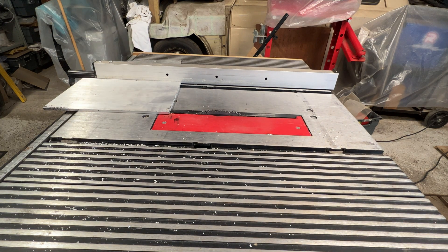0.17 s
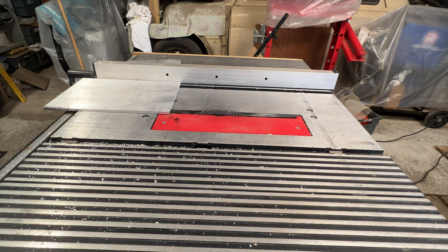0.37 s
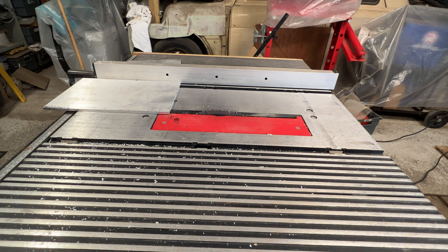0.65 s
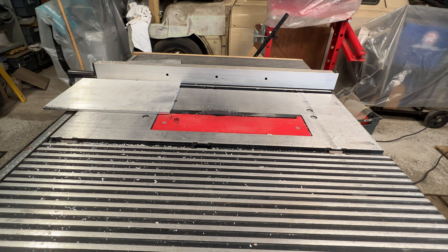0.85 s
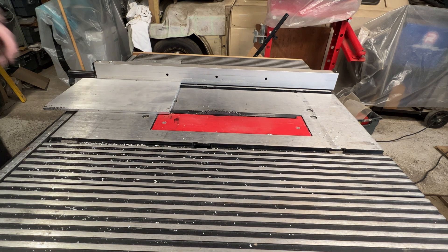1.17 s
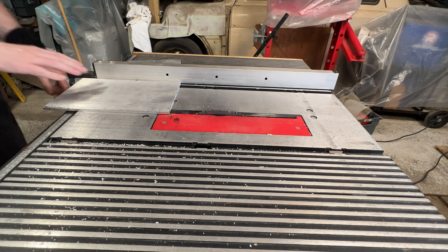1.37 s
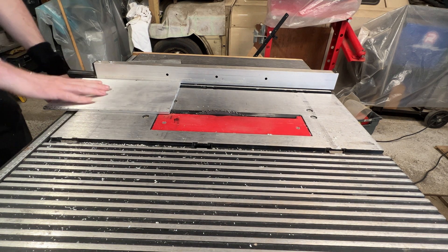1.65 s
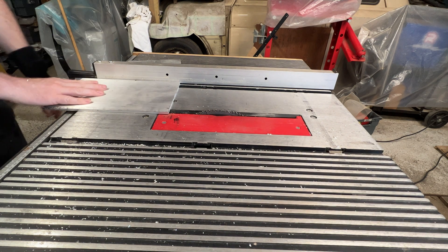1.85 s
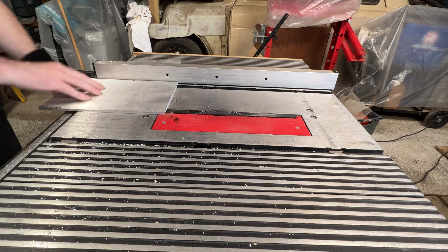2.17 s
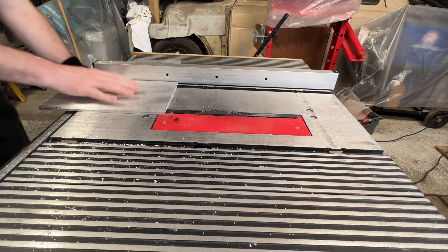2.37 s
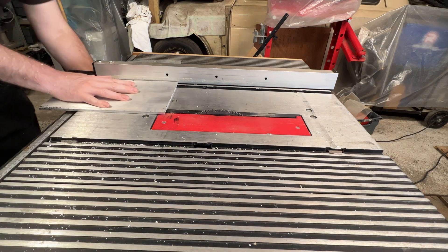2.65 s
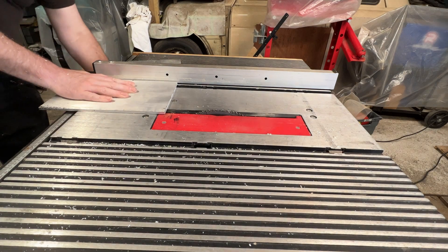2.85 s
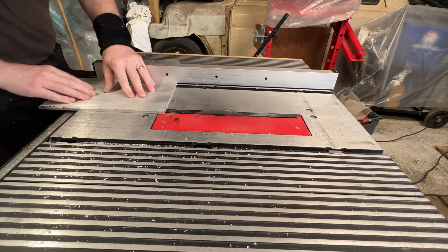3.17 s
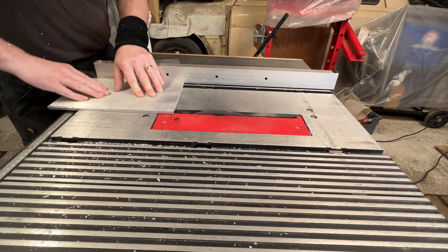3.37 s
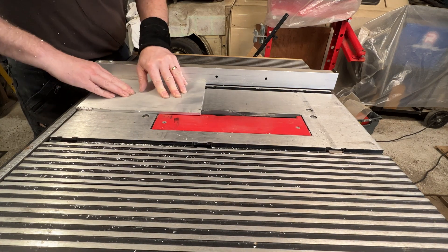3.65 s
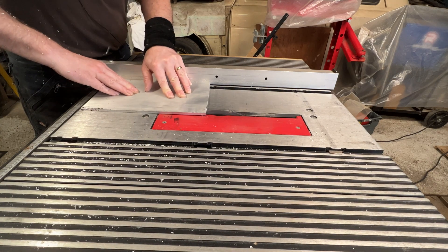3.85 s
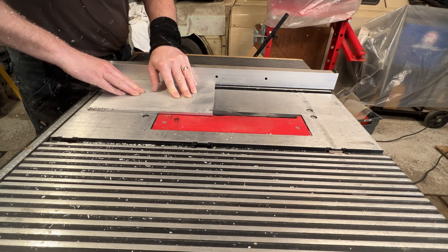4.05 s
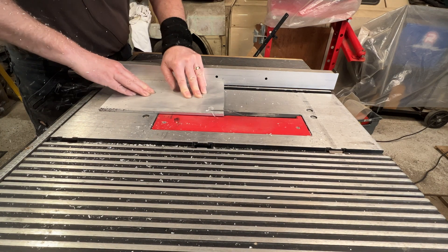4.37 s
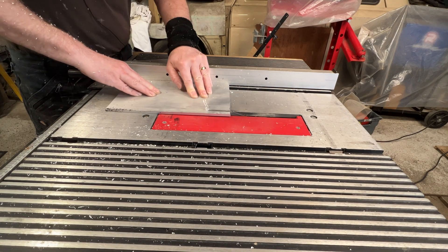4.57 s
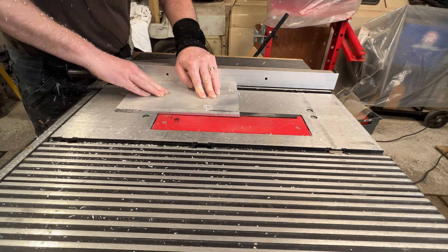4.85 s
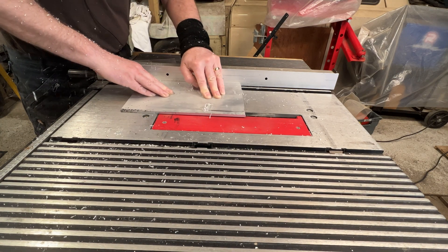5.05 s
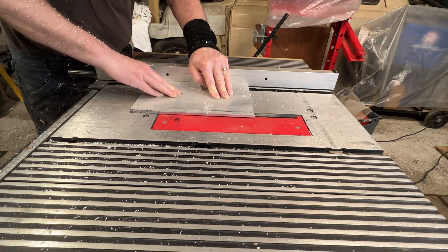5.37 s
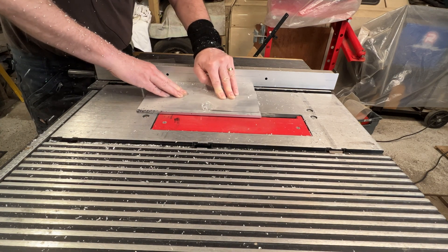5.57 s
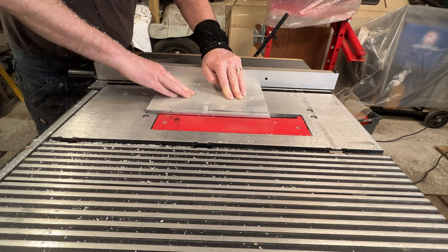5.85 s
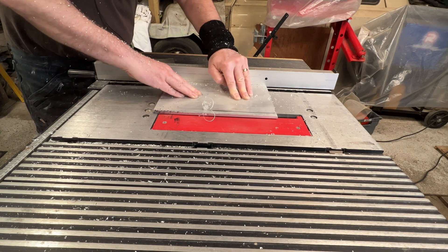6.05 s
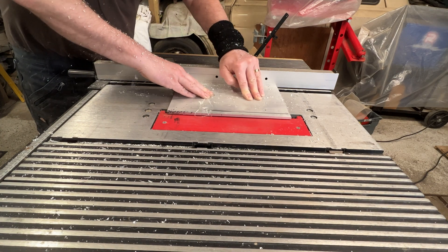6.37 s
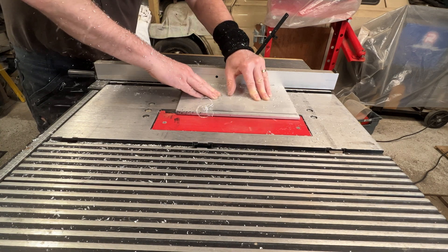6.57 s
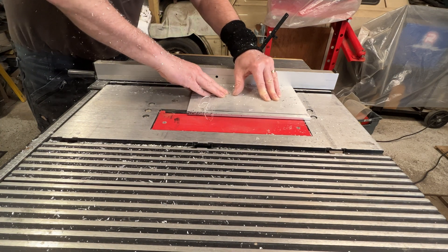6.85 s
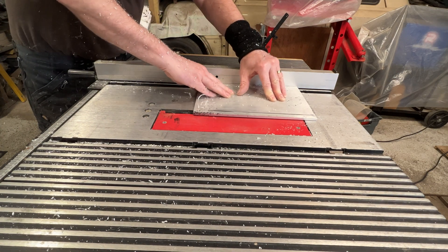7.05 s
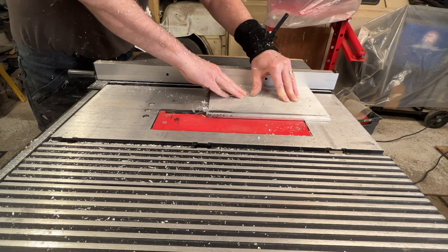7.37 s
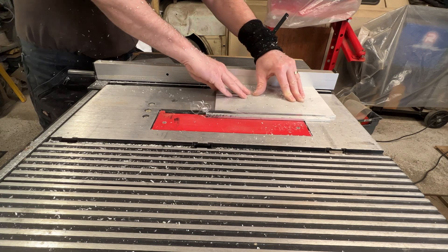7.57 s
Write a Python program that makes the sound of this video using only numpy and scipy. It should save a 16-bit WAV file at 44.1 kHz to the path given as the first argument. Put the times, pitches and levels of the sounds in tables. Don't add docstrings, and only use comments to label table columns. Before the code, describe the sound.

In a quiet workshop with faint mains hum, a metal plate is knocked, rubbed and dragged over a ribbed saw table with small ticks and scrapes. Abruptly a switch slams, a brushed motor whirs up, and the blade bites thick aluminium: a very loud, ragged screech with shifting squeals, chip hiss and motor roar, easing as the blade breaks through at the end. One close microphone, practically mono.

```python
import sys
import numpy as np
from scipy import signal
from scipy.fft import rfft, irfft, next_fast_len
from scipy.io import wavfile
from scipy.ndimage import uniform_filter1d

SR = 44100
rng = np.random.default_rng(int(sys.argv[2]) if len(sys.argv) > 2 else 0)


def attenuation_scalar(level_db):
    decades = np.asarray(level_db, float) / 20
    return 10 ** decades


def dump(signal):
    limited = np.clip(np.atleast_2d(signal).T, -1, 1)
    pcm = np.round(limited * 32767).astype(np.int16)
    wavfile.write(sys.argv[1], SR, pcm)


N = 340011
T = np.arange(N) / SR
STEP = 16
BLOCK = 2048

SCENE_CHANGE_S, START_S, BITE_S, EXIT_S = 2.875, 2.98, 3.61, 7.42
TOOTH_COUNT, FREE_TOOTH_HZ = 50, 4390

# t/s, tooth rate f/Hz
SPEED = [(2.98, 2676), (3.05, 3298), (3.22, 3872), (3.4, 4170), (3.67, 4170), (3.8, 3970), (3.92, 3690),
         (4.1, 3335), (4.5, 3195), (5.0, 3110), (5.6, 3150), (5.92, 3215), (6.3, 3020), (6.42, 3120),
         (6.75, 3024), (7.0, 3172), (7.42, 3180), (7.5, 3440)]
# t/s, level/dB
FEED = [
    (3.65, -53),
    (3.74, -17),
    (4.67, -15.5),
    (5.58, -17),
    (6.21, -17),
    (6.7, -16.5),
    (7.33, -16),
    (7.49, -26.5),
    (7.71, -20.5),
]
# t/s, length/s, level/dB
WHISTLE_DB = (-38, -38.5, -47, -50)
SHRIEKS = [
    [(3.65, 0.18, -38), (4.5, .45, -43), (5.45, 0.36, -40), (6.45, .2, -43), (6.75, 0.6, -35)],
    [(3.655, 0.07, -26), (3.72, .09, -27), (3.78, .3, -43), (3.4, .32, -36), (4.085, 0.27, -26.5),
     (4.4, .2, -33), (4.87, 0.3, -26), (5.25, 0.4, -30), (4.55, .3, -34), (6.42, 0.46, -47),
     (5.9, 0.2, -27.5), (6.08, 0.3, -29.5), (7.05, 0.45, -30)],
    [(3.65, .09, -37), (3.97, .12, -39), (4.25, 0.3, -42)],
    [(3.66, .06, -46)],
]
# f/Hz, density/(dB per Hz)
BITE = [(530, -6), (800, 0), (1050, -4), (1550, -4), (2390, 1), (3140, -8), (3410, 1), (3720, -4),
        (6120, -7.5), (7500, -26), (9750, -28), (16500, -120)]
# f/Hz, density/(dB per Hz)
CHIPS = [(2940, -19.5), (5000, -6.5), (5640, -4.5), (6260, -8), (6920, -7.5), (11000, -8.5), (12500, -10.5),
         (15700, -12.5)]
# t/s, length/s, level/dB
SPRAY = [
    (3.655, 0.058, -33),
    (7.1, 0.35, -37),
]
# f/Hz, width/Hz, level/dB
BLADE_MODES = [(1890, 115, -5.5), (2330, 21, 9), (2750, 540, 4.5), (2890, 20, -1), (4046, 180, -1),
               (5300, 96, -21)]
# f/Hz, width/Hz, level/dB
RIM_MODES = [(6620, 220, 1.5), (7270, 120, 3), (8000, 170, -1), (8470, 170, -2), (9800, 150, -10),
             (12700, 230, -17)]
# t/s, length/s, level/dB, f/Hz
HOWLS = [(3.72, 0.46, -29, 2998), (4.15, 0.74, -26.5, 2640), (5.0, 0.46, -47, 2765),
         (5.45, 0.53, -31, 2653), (6.0, .45, -38, 2750), (6.48, 0.29, -31, 2400), (7.15, 0.32, -38, 2824)]
# f/Hz, width/Hz, steady level/dB
RINGS = [(1383, 127, -37.5), (3440, 80, -32.5), (4504, 90, -36), (5010, 62, -35.5)]
# t/s, length/s, level/dB
FLARES = [
    [(6.72, 0.17, -28)],
    [(4.3, .4, -34), (5.3, 0.84, -35), (6.2, 0.35, -29), (5.9, 0.43, -37), (7.0, .4, -33)],
    [(3.66, 0.22, -46), (6.38, .2, -44), (5.6, 0.4, -41)],
    [(5.9, 0.51, -40), (6.55, 0.35, -44), (7.05, .3, -37)],
]
# f/Hz, density/(dB per Hz)
CLATTER = [(500, -22), (700, 3.5), (1300, -2.5), (2000, 0), (2900, 1), (3500, -4), (4500, -20)]
# t/s, length/s, level/dB
STEADY_CUT = [(4.4, 1.33, -27), (5.7, 1.02, -26)]
# t/s, length/s, start f/Hz, end
# f/Hz, level/dB
SQUEALS = [(3.69, 0.07, 4350, 3900, -24.5), (3.68, .1, 4480, 4400, -28), (3.7, 0.13, 2900, 2510, -30),
           (6.45, .17, 12450, 12300, -42), (6.62, .06, 12200, 12160, -35), (6.68, .14, 12050, 12030, -35),
           (6.8, .13, 12080, 12350, -38), (6.63, .08, 2380, 2700, -30), (3.702, 0.27, 6620, 6670, -30.5),
           (6.92, 0.07, 4030, 4046, -24.5), (7.3, 0.06, 3060, 3010, -22), (7.35, .05, 2880, 2720, -21)]
# t/s, length/s, level/dB, f/Hz
CRIES = [(3.8, 0.36, -28.5, 1966), (3.851, .27, -24.5, 3510), (3.9, 0.34, -29, 4320),
         (4.0, .3, -30.5, 1720), (4.15, 0.31, -22, 2537), (4.303, .2, -25, 2870), (4.48, .28, -23.5, 2844),
         (4.451, 0.33, -29, 2450), (4.66, 0.19, -25, 2365), (4.7, 0.53, -35, 1720), (4.72, .2, -32, 700),
         (4.801, 0.66, -31, 2680), (4.949, .36, -33, 1950), (5.0, .2, -34, 2420), (5.05, .36, -32.5, 4520),
         (5.3, .2, -32, 2450), (5.279, 0.49, -38, 1320), (5.448, 0.23, -33, 1470), (5.42, 0.31, -26, 2880),
         (5.7, .25, -36, 3902), (5.702, 0.2, -24.5, 2370), (5.72, 0.48, -27.5, 2956),
         (5.698, 0.52, -29, 2696), (5.841, .42, -36, 1320), (6.1, 0.19, -31, 1850), (6.25, 0.27, -28, 2600),
         (6.347, .2, -30, 2330), (6.35, 0.22, -28.5, 1550), (6.52, 0.13, -23.5, 2190),
         (6.549, .14, -24, 2340), (6.67, 0.12, -21.5, 2720), (6.5, .17, -31, 1290), (6.9, .27, -28, 2467),
         (6.9, 0.29, -30, 1420), (6.952, .4, -29, 2750), (6.802, .15, -37, 5380), (7.15, 0.7, -31.5, 5390),
         (7.152, .2, -31, 1620), (7.449, .26, -33, 4400),
         (3.655, .11, -39, 8620), (3.897, .16, -40, 7290), (4.0, .6, -36, 8500), (4.65, 1.1, -36, 8060),
             (5.0, .3, -29, 5850), (3.698, .5, -36, 10000), (4.38, .17, -34, 9600), (6.405, .6, -36, 7350),
             (6.899, 0.49, -43, 8080), (5.45, 0.49, -29, 6080), (6.65, .2, -36, 5500),
             (5.55, .15, -44, 12500), (4.25, .15, -44, 12900), (7.33, .14, -35, 7250),
             (7.33, .14, -36, 6620), (7.15, .22, -41, 12500), (7.385, .05, -35, 12950),
             (7.62, .06, -40, 13850), (7.5, .2, -38, 8550)]
# t/s, length/s, rms level/dB, f/Hz
TONES = [(4.68, .74, -34, 754), (5.48, .34, -33, 754), (5.32, .45, -32, 1325), (5.8, .4, -35, 1335),
         (5.44, .27, -35, 1450), (4.98, .2, -29, 560), (5.17, .17, -30, 560), (4.74, .13, -34, 690),
         (5.42, .25, -31, 2960), (5.85, .27, -32, 2990), (3.87, .2, -37, 7300), (5.4, .5, -34, 3300),
         (4.8, .3, -39, 1380), (3.2, 4.5, -36, 474), (3.2, 2.4, -36.5, 452), (5.8, 1.9, -38, 517),
         (4.0, 1.5, -36, 538), (3.87, .25, -31, 3500), (3.3, .4, -34, 409), (4.2, 2.5, -33.5, 3444),
         (6.7, .95, -36, 3490), (7.38, .33, -31, 4410), (4.3, 3.1, -42, 5017), (4.4, 1.5, -35, 2694),
         (4.2, 1.3, -35, 2440), (6.6, .35, -39, 1380), (4.9, 2.4, -39, 4504)]
# f/Hz, density/(dB per Hz)
CASE = [(12, -56), (20, -20.5), (130, -10.5), (156, -12.5), (188, -10.5), (320, -5), (367, -11),
        (463, -1.5), (655, -8), (2080, -15.5), (2810, -14.5), (5000, -25.5), (6500, -38), (11000, -120)]
# f/Hz, density/(dB per Hz)
AIR = [(2350, -31), (4000, -3), (6260, -2.5), (6790, -6), (13600, -17.5), (15800, -24)]
# t/s, length/s, level/dB
DRIVE_DB = (-44.5, -38.5, -42)
SHUDDERS = [
    [(3.25, 0.5, -28.5), (4.05, 0.16, -42), (4.9, 1.1, -45), (7.4, .13, -42)],
    [(3.1, 0.48, -31), (3.88, 0.32, -29), (5.2, 0.32, -32), (7.4, 0.13, -27)],
    [(4.65, 1.27, -40)],
]
# t/s, length/s, level/dB
WHOOSH = [(2.99, 0.24, -29.5)]
# t/s, peak level/dB, t60/s
SWITCH = [
    (2.9614, -22, 0.034),
    (2.966, -3.5, 0.12),
    (2.981, -11, 0.15),
]
# f/Hz, density/(dB per Hz)
BANG = [(24, -50), (45, -17), (166, -2), (670, -2), (1080, -7.5), (1190, -7), (2450, -10.5), (4800, -21),
        (5720, -20.5), (15500, -38)]
# f/Hz, density/(dB per Hz)
RUMBLE = [(76, -46), (130, -8), (211, -4.5), (394, 1.5), (471, -4), (632, 0.5), (1100, -20), (1430, -50),
          (2420, -120)]
# f/Hz, density/(dB per Hz)
SCUFF = [(470, -22), (800, -1.5), (1490, -3.5), (1920, -3), (2060, -7), (2380, -3), (3400, -18),
         (4420, -45), (7480, -120)]
# f/Hz, density/(dB per Hz)
GRIT = [(1590, -30), (2700, -1), (3270, -4), (4280, 1), (5060, -5), (6040, -5.5), (6830, -10), (15500, -29)]
# f/Hz, width/Hz, level/dB
GRIT_RING = [(3050, 300, -7), (4000, 120, -8), (5900, 500, -6), (7620, 300, -8), (10500, 400, -15)]
# peak t/s, rise/s, fall/s, level/dB, brightness/dB
STROKES = [(0.0, .01, .17, -32.5, -3.5), (.334, 0.19, .07, -56.5, -1), (.71, 0.088, 0.099, -50, -1.5),
           (.95, .002, 0.024, -36.5, -3), (.976, 0.027, 0.11, -55, -13), (1.09, 0.15, 0.27, -58.5, -6),
           (1.7, 0.033, 0.17, -49, -2.5), (1.946, 0.36, 0.12, -48, 0), (2.09, 0.025, 0.057, -59, -7),
           (2.3, 0.56, 0.91, -61.5, 4), (2.572, .12, 0.18, -61, -7), (2.873, 0.23, .004, -45, 0)]
# peak t/s, rise/s, fall/s, level/dB
SING = [
    (1.698, 0.018, 0.097, -53),
    (2.08, 0.017, 0.28, -70),
    (2.534, 0.16, 0.13, -54),
]
# t/s, length/s, buzz level/dB
RIBS = [(1.12, 0.67, -53)]
# f/Hz, width/Hz, level/dB
RIB_RING = [(640, 45, 8), (800, 33, -14), (1260, 85, -1.5), (1600, 96, -14), (2000, 86, -18),
            (2350, 110, -17), (3050, 110, -18), (3670, 110, -17), (5000, 150, -17), (950, 68, -16),
            (370, 78, -7)]
# t/s, peak level/dB, f/Hz, width/Hz, t60/s
TICKS = [(0, -37, 640, 160, 0.37), (.281, -39, 3000, 903, 0.013), (.282, -67, 4600, 1500, .01),
         (.568, -49, 2900, 800, .014), (.569, -50, 4500, 900, .01), (.582, -56, 4000, 2500, .008),
         (.676, -50, 6000, 8000, .008), (.686, -50, 5000, 6000, .008), (0.705, -38, 4430, 2500, 0.008),
         (0.704, -49, 8500, 6000, .01), (2.079, -61, 4000, 600, .03), (2.088, -45, 4000, 600, .04),
         (2.089, -51, 1950, 600, .04), (2.523, -52, 1240, 900, .25), (2.562, -39, 1140, 700, 0.14),
         (2.529, -49, 440, 130, .3), (2.585, -46, 440, 130, .4), (2.563, -37, 1300, 300, .08),
         (1.164, -46, 800, 900, .03), (0, -36, 260, 90, .3), (0, -42, 1200, 200, .2),
         (1.384, -44, 640, 120, .15), (.9493, -35, 1300, 1500, .05), (2.564, -44.5, 780, 150, 0.45),
         (.96, -42, 232, 60, 0.75), (1.163, -47, 900, 1000, .03), (1.366, -37, 640, 200, 0.1),
         (2.771, -43, 1500, 2500, 0.05), (2.77, -56, 5000, 4000, .04), (2.711, -56, 2000, 2500, .03),
         (2.929, -56, 550, 700, 0.081)]
# t/s, peak level/dB, f/Hz, t60/s
THUDS = [(.95, -36, 130, .12), (2.09, -46, 190, .15), (1.02, -39, 66, 0.47), (1.164, -27, 124, 0.053),
         (1.72, -37, 67, 0.28), (3.09, -30, 68, 0.34), (7.43, -12, 145, 0.19), (7.461, -12, 274, 0.16)]
# f/Hz, level/dB, t60/s
KNOCK = [(282, 4.5, 0.057), (560, -30, 0.38), (1100, -12, 0.11), (1320, -5, 0.04), (1800, -0.5, 0.021)]
# t/s, length/s, level/dB, f/Hz, width/Hz
SCRAPES = [(1.69, .07, -60, 2450, 400), (1.69, .07, -62, 4200, 400), (1.86, .13, -58, 1900, 250),
           (1.88, .1, -60, 1250, 250), (1.88, .1, -62, 2450, 300), (1.88, .12, -57, 650, 300),
           (2.18, .05, -69, 4000, 200), (2.46, .1, -66, 3050, 300), (2.81, .065, -59, 2800, 500),
           (2.8, .075, -62, 4500, 500), (2.68, .15, -61, 780, 100), (1.0, .15, -52, 232, 50),
           (1.42, .2, -55, 660, 90), (1.3, .35, -70, 2730, 90), (2.52, .13, -55, 1300, 600),
           (2.15, .35, -69, 8500, 2600), (1.58, .1, -57, 660, 90)]
# f/Hz, density/(dB per Hz)
ROOM = [(15, -13), (30, -30), (60, -20), (130, -31), (250, -30.5), (565, -37), (746, -34), (857, -40),
        (3000, -49.5), (11400, -54), (15500, -60)]
# f/Hz, rms level/dB
HUM = [(100, -54.5), (200, -75)]
SIDE_S = [3.46, 3.853, 3.948, 3.994, 4.203, 4.968, 5.2, 5.27, 5.293, 5.387, 5.711, 6.13, 6.339, 6.456,
          6.573, 7.105, 7.129, 7.361, 7.5, 7.523]


def blade(tooth_hz):
    gate, feed_db = curves(FEED, edge_s=0.028)
    tooth = (np.cumsum(tooth_hz) / SR).astype(int) % TOOTH_COUNT
    runout = uniform_filter1d(rng.standard_normal(TOOTH_COUNT), size=17, mode="wrap")
    depth = attenuation_scalar(1.1 * unit(runout)[tooth])
    cutting = attenuation_scalar(-3 * between(EXIT_S, 9, 0.032, 1))

    whistle = np.zeros(N)
    for multiple, (db, rows) in enumerate(zip(WHISTLE_DB, SHRIEKS), 1):
        whistle += swells(db, rows) * attenuation_scalar(0.98 * walk(14)) * band(multiple * tooth_hz, 74.0 * multiple)
    whistle *= depth * cutting ** 2

    hits = depth * grains(0.39, size=14)
    bite = colour(hits, BITE) + attenuation_scalar(-2.5) * ring(hits, BLADE_MODES, 1.5, rate=5)
    chips = colour(hits, CHIPS) + attenuation_scalar(-8.0) * ring(hits, RIM_MODES, 1.8, rate=5)
    chips *= cutting * swells(-27, SPRAY) * attenuation_scalar(0.5 * walk(9.9))

    at_s, length_s, _, hz = np.transpose(HOWLS)
    howl_hz = np.interp(T, at_s + length_s / 2, hz) * (1 + 0.02 * walk(6))
    howl = swells(-30.5, HOWLS) * depth * band(howl_hz, 450.0)

    rings = np.zeros(N)
    for (hz, width_hz, db), rows in zip(RINGS, FLARES):
        rings += swells(db, rows) * attenuation_scalar(0.8 * walk(6)) * band(hz * (1 + 0.004 * walk(3)), width_hz)
    return gate * (whistle + rings + attenuation_scalar(feed_db - 6.5) * bite + chips + howl + clatter(tooth_hz))


def clatter(tooth_hz):
    points = 700
    turns = np.cumsum(tooth_hz) / SR / TOOTH_COUNT
    fresh = rng.standard_normal((N // points + 40, points))
    pattern = signal.lfilter([1], [1, -0.866], fresh, axis=0).ravel()
    knocks = np.interp(turns * points, np.arange(len(pattern)), pattern)
    return swells(-45, STEADY_CUT) * colour(knocks, CLATTER)


def squeals():
    out = np.zeros(N)
    held = [(at_s, length_s, hz, hz, db) for at_s, length_s, db, hz in CRIES]
    for at_s, length_s, start_hz, end_hz, db in SQUEALS + held:
        span = span_of(at_s, length_s)
        part = (T[span] - at_s) / length_s
        glide_hz = end_hz - start_hz
        width_hz = start_hz / 23.4 / max(start_hz / 2800.0, 1)
        width_hz += 0.051 * abs(glide_hz) / length_s
        swell = np.abs(np.sin(np.pi * part)) ** 0.42
        out[span] += attenuation_scalar(db) * swell * band(start_hz + glide_hz * part, width_hz)
    return out


def tones():
    out = np.zeros(N)
    wander = 1 + 0.004 * walk(12)
    flicker = attenuation_scalar(3.5 * walk(22))
    for k, (at_s, length_s, db, hz) in enumerate(TONES):
        span = span_of(at_s, length_s)
        own = np.arange(N)[span] - k * SR // 9
        swell = np.abs(np.sin(np.pi * (T[span] - at_s) / length_s)) ** 0.5
        tone = np.sqrt(2) * np.sin(2 * np.pi * hz * np.cumsum(wander[own]) / SR)
        out[span] += attenuation_scalar(db) * swell * flicker[own] * tone
    return out


def motor(tooth_hz):
    speed = tooth_hz / FREE_TOOTH_HZ
    loaded = between(BITE_S, EXIT_S - 0.05, 0.12, 0.067)
    kick = np.exp(-np.abs(T - START_S) / 0.012)
    roar_db = -16.5 + 9 * kick - 2.5 * loaded + 0.6 * walk(14)
    casing_db = -5.0 + 1.5 * (between(3.14, 9, 0.15, 1) - loaded)
    roar = colour(grains(1.28, size=80), CASE) + attenuation_scalar(casing_db) * band(np.full(N, 485.0), 160.0)

    turn_hz = tooth_hz / TOOTH_COUNT
    second, fourth, mesh = (swells(db, rows) * attenuation_scalar(0.8 * walk(4.0)) for db, rows in zip(DRIVE_DB, SHUDDERS))
    hum = second * np.sqrt(2) * np.sin(4 * np.pi * np.cumsum(turn_hz) / SR)
    hum += fourth * band(4 * turn_hz, 9.0)
    hum += mesh * band(np.full(N, 755.0), 15.0)
    rush = attenuation_scalar(-30.0) * speed ** 2.7 * colour(rng.standard_normal(N), AIR)

    whine = swells(-33.5, WHOOSH) * band(0.765 * tooth_hz, 570.0)
    whine += attenuation_scalar(-52.5) * speed ** 0.8 * band(3.17 * tooth_hz, 200.0)
    running = between(START_S, 9, 0.019, 1)
    run_up = between(START_S, BITE_S, 0.036, 0.054)
    return running * (attenuation_scalar(roar_db) * speed ** 0.97 * roar + hum + rush) + run_up * whine


def speeded(x):
    free, cut = 0.46, 0.35
    share = free + (cut - free) * between(BITE_S, EXIT_S, 0.6, 0.2)
    y = x * np.sqrt(1 - share ** 2)
    for i in range(BLOCK, N, BLOCK):
        n = min(BLOCK, N - i)
        y[i:i + n] += share[i:i + n] * y[i - BLOCK:i - BLOCK + n]
    return y


def switch():
    out = np.zeros(N)
    for at_s, db, t60_s in SWITCH:
        add(out, at_s, attenuation_scalar(db) * colour(rng.standard_normal(SR // 4), BANG), t60_s)
    return out


def handling():
    rumble = colour(grains(0.64, size=200), RUMBLE)
    scuff = colour(grains(0.93, size=60), SCUFF)
    dust = grains(1.7, size=30)
    grit = colour(dust, GRIT)
    out = swells(-150, RIBS) * ring(grains(1.3, size=40), RIB_RING, 3.0, rate=13.7)
    (at_s, length_s, _), = RIBS
    drag = between(at_s + 0.063, at_s + length_s - 0.2, 0.03, 0.16)
    out += drag * (attenuation_scalar(-54) * rumble + attenuation_scalar(-71) * scuff)

    for at_s, rise_s, fall_s, db, bright_db in STROKES:
        rub = attenuation_scalar(db - bright_db) * rumble + attenuation_scalar(db) * scuff
        rub += attenuation_scalar(db - 7.5 + 0.2 * bright_db) * grit
        out += stroke(at_s, rise_s, fall_s) * rub
    plate = ring(dust, GRIT_RING, 2.2, rate=19)
    for at_s, rise_s, fall_s, db in SING:
        out += stroke(at_s, rise_s, fall_s) * attenuation_scalar(db + 1.0) * plate
    strikes(out)
    return out


def strikes(out):
    t = T[:SR // 2]
    for at_s, db, hz, width_hz, t60_s in TICKS:
        peak = signal.iirpeak(hz, hz / width_hz, SR)
        strike = rng.standard_normal(SR // 6)
        strike[0] += 5.8
        snap = signal.lfilter(*peak, signal.lfilter(*peak, strike))
        add(out, at_s, attenuation_scalar(db - 2.5) * unit(snap), t60_s)
    for at_s, db, hz, t60_s in THUDS:
        add(out, at_s, attenuation_scalar(db) * np.sin(2 * np.pi * hz * t) * (1 - np.exp(-t / 0.0075)), t60_s)
    knock_s, knock_db = 0.96, -28.5
    for hz, db, t60_s in KNOCK:
        add(out, knock_s, attenuation_scalar(knock_db + db) * np.sin(2 * np.pi * hz * t), t60_s)
    add(out, knock_s, attenuation_scalar(-58) * rng.standard_normal(len(t)), 0.018)


def scrapes():
    out = np.zeros(N)
    for at_s, length_s, db, hz, width_hz in SCRAPES:
        span = span_of(at_s, length_s)
        out[span] += swells(-150, [(at_s, length_s, db)])[span] * band(hz + 0 * T[span], width_hz)
    return out


def workshop():
    air = attenuation_scalar(-61 + 0.29 * walk(5.1)) * colour(rng.standard_normal(N), ROOM)
    hum = np.zeros(N)
    for hz, db in HUM:
        hum += attenuation_scalar(db + 0.29 * walk(4.9)) * np.sqrt(2) * np.sin(2 * np.pi * hz * T)
    return np.where(T < SCENE_CHANGE_S, air + hum, attenuation_scalar(0.5) * uniform_filter1d(air, size=10))


def unit(x):
    return x / np.sqrt(np.mean(x ** 2))


def span_of(at_s, length_s):
    return slice(int(at_s * SR), int((at_s + length_s) * SR))


def curves(table, edge_s=0.01):
    s, *columns = np.transpose(table)
    gate = np.clip(np.minimum(T - s[0], s[-1] + edge_s - T) / edge_s, 0, 1)
    return gate, *(np.interp(T, s, c) for c in columns)


def stretch(coarse, size=N):
    return np.interp(np.arange(size) / STEP, np.arange(len(coarse)), coarse)


def walk(rate_hz):
    k = int(SR / STEP / rate_hz)
    held = np.repeat(rng.standard_normal(N // STEP // k + 2), k)
    return stretch(unit(uniform_filter1d(uniform_filter1d(held, k), k)))


def colour(x, spectrum):
    hz, db = np.transpose(spectrum)
    size = next_fast_len(len(x))
    f = np.arange(size // 2 + 1) * SR / size + 1
    gain = attenuation_scalar(np.interp(np.log(f), np.log(hz), db, -150, -150))
    return unit(irfft(rfft(x, size) * gain, size)[:len(x)])


def grains(spread_db, size):
    loudness = attenuation_scalar(spread_db * rng.exponential(size=N // size + 1))
    return rng.standard_normal(N) * np.repeat(loudness, size)[:N]


def ring(x, modes, patchy_db, rate):
    out = np.zeros(N)
    for hz, width_hz, db in modes:
        mode = signal.lfilter(*signal.iirpeak(hz, hz / width_hz, SR), x)
        out += attenuation_scalar(db + patchy_db * walk(rate)) * mode
    return unit(out)


def band(hz, width_hz):
    b, a = signal.butter(2, width_hz / 2, fs=SR / STEP)
    even, odd = signal.lfilter(b, a, rng.standard_normal((2, len(hz) // STEP + 2)))
    phase = 2 * np.pi * np.cumsum(hz) / SR
    return unit(stretch(even, size=len(hz)) * np.cos(phase) + stretch(odd, size=len(hz)) * np.sin(phase))


def add(out, at_s, sound, t60_s):
    i = int(at_s * SR)
    n = min(len(sound), N - i)
    out[i:i + n] += sound[:n] * 1000.0 ** (-T[:n] / t60_s)


def swells(steady_db, rows):
    out = np.full(N, attenuation_scalar(steady_db))
    for at_s, length_s, db, *_ in rows:
        span = span_of(at_s, length_s)
        out[span] += attenuation_scalar(db) * np.abs(np.sin(np.pi * (T[span] - at_s) / length_s)) ** 0.6
    return out


def stroke(at_s, rise_s, fall_s):
    t = T[:int(SCENE_CHANGE_S * SR)]
    gain = attenuation_scalar(-31.5 * np.maximum((at_s - t) / rise_s, (t - at_s) / fall_s))
    return np.pad(gain, (0, N - len(t)))


def between(from_s, to_s, in_s, out_s):
    return np.clip(np.minimum((T - from_s) / in_s, (to_s - T) / out_s + 1), 0, 1)


def split_bands(x):
    side = np.zeros(N)
    window = np.sin(np.pi * np.arange(BLOCK) / BLOCK) ** 2
    f_khz = np.arange(BLOCK // 2 + 1) * SR / BLOCK / 1000
    for at_s in SIDE_S:
        i = int(at_s * SR) - BLOCK // 2
        low_khz = rng.uniform(4.5, 14.2, size=(2, 1))
        inside = np.any((f_khz > low_khz) & (f_khz < low_khz + 1.7), axis=0)
        scrambled = rfft(x[0, i:i + BLOCK]) * np.exp(2j * np.pi * rng.random(len(f_khz)))
        side[i:i + BLOCK] += attenuation_scalar(-2.5) * window * irfft(scrambled * inside, BLOCK)
    return x + np.array([side, -side])


def scene():
    tooth_hz = curves(SPEED)[1]
    sawing = speeded(blade(tooth_hz) + squeals() + tones() + motor(tooth_hz))
    mono = sawing + switch() + handling() + scrapes() + workshop()
    return np.array([mono, mono])


def top_cut(x):
    return signal.sosfilt(signal.butter(12, 17080, fs=SR, output="sos"), x)


def record(dry):
    low_pass = signal.ellip(10, 0.2, 70, 15800, fs=SR, output="sos")
    clipped = np.clip(signal.sosfilt(low_pass, dry), -1, 1)
    return top_cut(split_bands(clipped))


dry = scene()
out = record(dry)
dump(out)
```